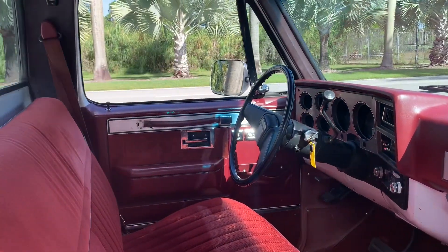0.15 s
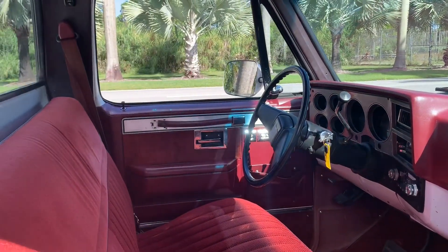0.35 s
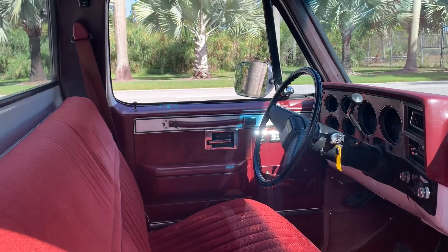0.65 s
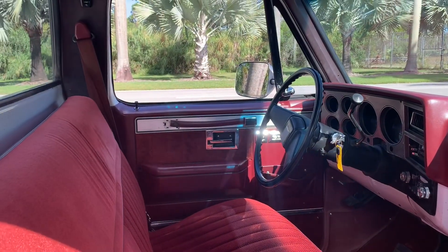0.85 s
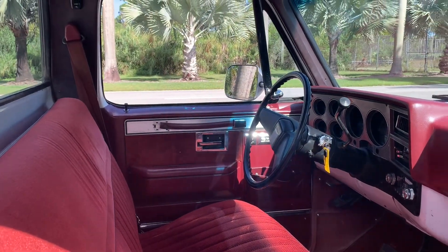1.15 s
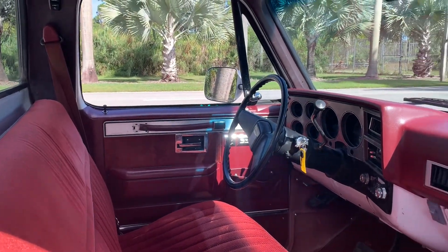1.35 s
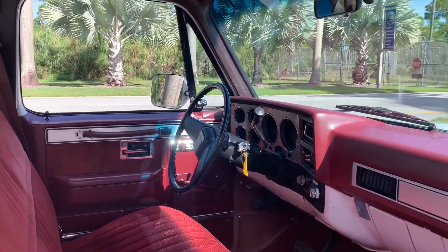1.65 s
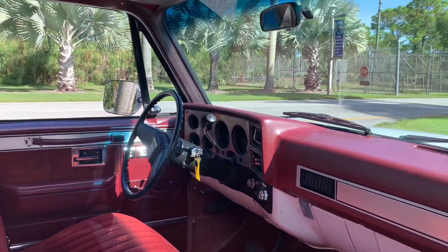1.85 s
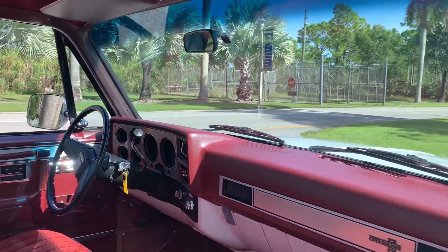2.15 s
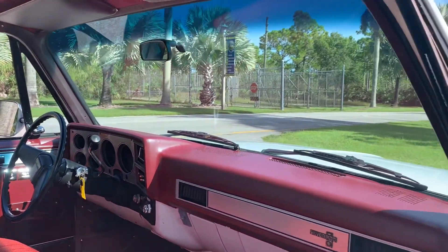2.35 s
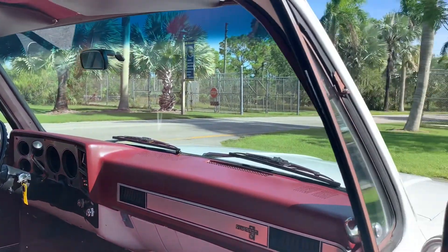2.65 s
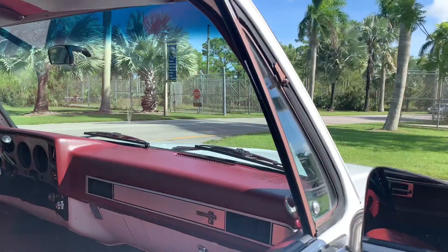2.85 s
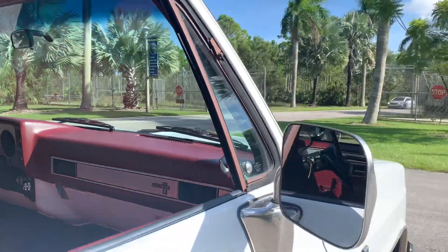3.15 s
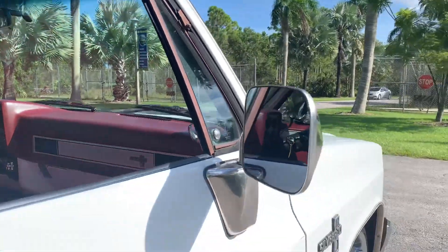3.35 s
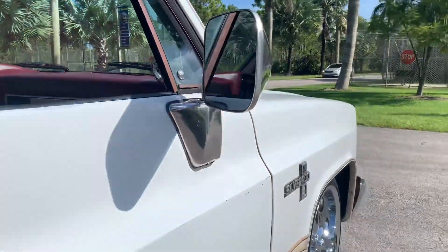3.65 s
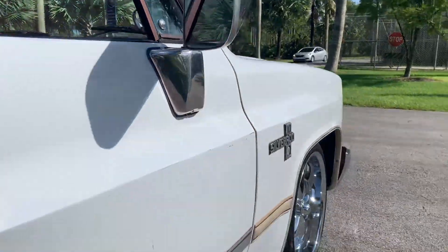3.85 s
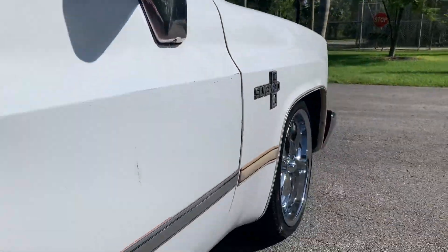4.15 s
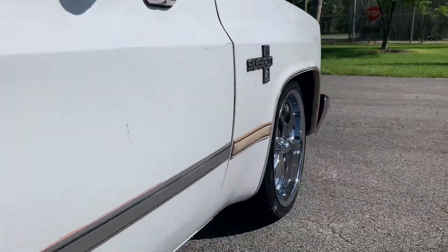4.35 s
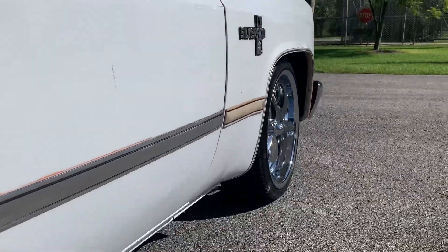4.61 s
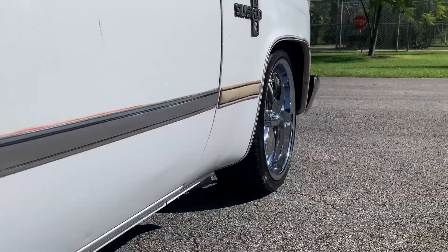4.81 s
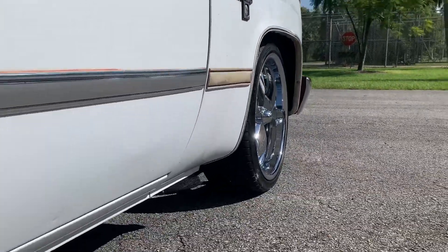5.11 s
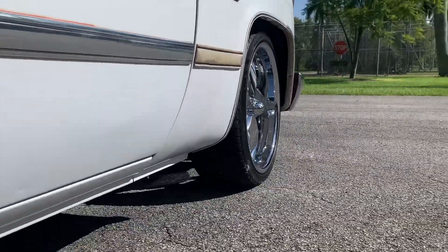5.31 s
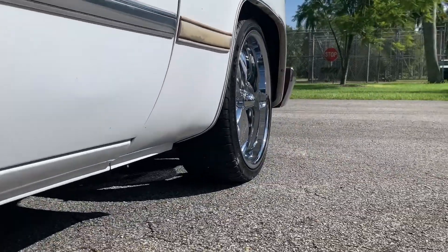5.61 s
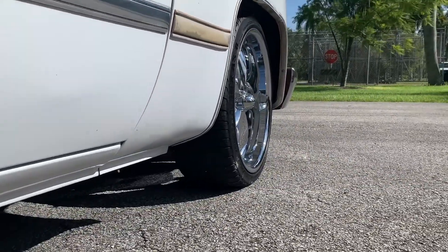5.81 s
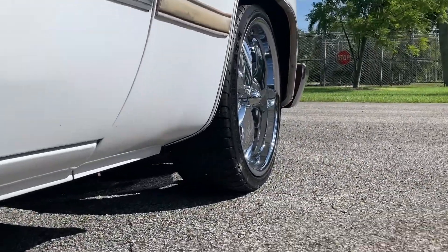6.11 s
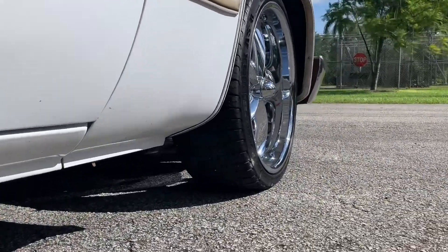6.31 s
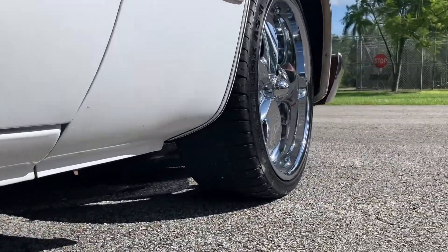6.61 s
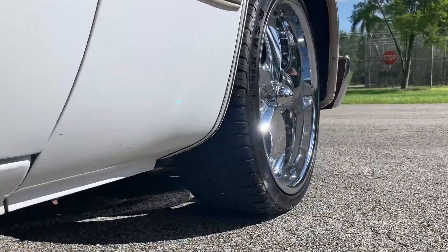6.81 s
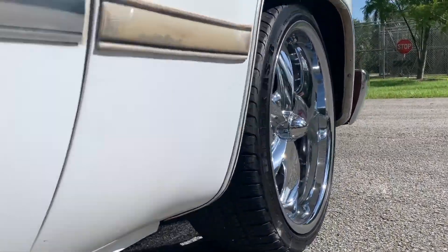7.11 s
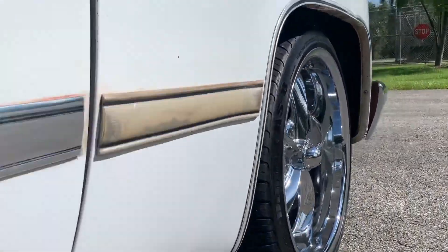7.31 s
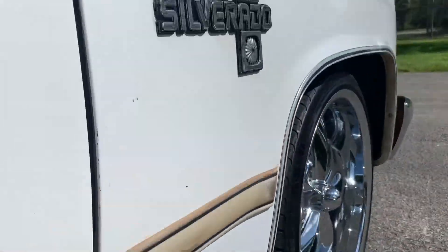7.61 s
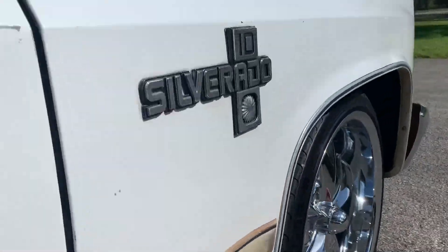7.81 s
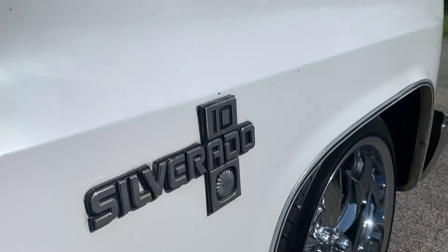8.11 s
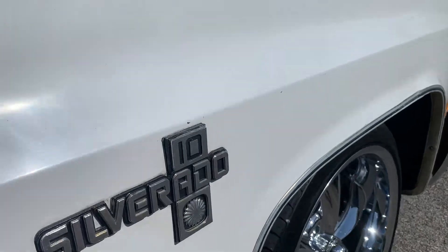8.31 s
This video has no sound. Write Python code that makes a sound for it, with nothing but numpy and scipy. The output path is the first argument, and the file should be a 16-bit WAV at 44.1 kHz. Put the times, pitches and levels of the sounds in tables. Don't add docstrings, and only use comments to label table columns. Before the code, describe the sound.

A rough eight-cylinder pickup idles outdoors, muffled and boomy inside the cab, then bright with ticking valves and clacking lifters near the front wheel.

```python
import sys
import numpy as np
from scipy import signal
from scipy.fft import rfft, irfft, next_fast_len
from scipy.io import wavfile
from scipy.ndimage import uniform_filter1d

SR = 44100
rng = np.random.default_rng(int(sys.argv[2]) if len(sys.argv) > 2 else 0)


def level_to_linear(level):
    exponent = np.asarray(level, float) / 20
    return 10 ** exponent


def digitize_waveform(pressure):
    field = np.atleast_2d(pressure).T
    bounded = np.clip(field, -1, 1)
    quanta = np.round(bounded * 32767).astype(np.int16)
    wavfile.write(sys.argv[1], SR, quanta)


N = 373086

# exhaust blow/dB, valve tick/dB, lifter tick/dB, unevenness/dB
CYLINDERS = [
    (-4.2, -6, -7, 1.2),
    (2.9, 4, 0, 1.5),
    (1.5, -14, -8, 1),
    (-.5, 0, -3, 1.2),
    (2.5, -3, 0, 4),
    (1.1, -4, -1, 1),
    (-.9, -2, -1, 4),
    (-2.4, 4.5, 2.5, 1.2),
]
# t/s, nearness to engine bay/dB, nearness to pipe/dB, cab drone/dB
WALK = [(0, -31, -13.5, -4.5), (.7, -35.5, -15, -1), (1.0, -34.5, -13.5, -1), (1.5, -34.5, -13, -4),
        (2.0, -30.5, -8, -4), (2.45, -24, -8, -18), (2.75, -20, -6.5, -17), (3.4, -16.5, -6.5, -13),
        (3.7, -13.5, -5, -19), (4.3, -11.5, -3, -11), (4.6, -10, -6.5, -6), (4.9, -7.5, -2, -12),
        (5.7, -6.5, -1, -12), (6.2, -6.5, -1, -10.5), (6.8, -5.5, 0, -33), (7.15, -5.5, -1.5, -10),
        (7.9, -11, -2, -20.5), (8.46, -11.5, -4, -39)]
# level/dB, share of the walk they feel
LIFTER, VALVE = (-47.5, 0.73), (-38.5, 1.11)


def evened(x):
    return x / np.sqrt(np.mean(x ** 2) + 1e-20)


def curves(rows):
    s, *columns = np.transpose(rows)
    return [np.interp(np.arange(N) / SR, s, c) for c in columns]


def coloured(x, gain):
    size = next_fast_len(N + 2048, True)
    return irfft(rfft(x, size) * gain(np.fft.rfftfreq(size, 1 / SR)), size)[..., :N]


def bell(hz, width):
    return lambda f: 1 / (1 + 2j * (f - hz) / width) ** 2


def slope(points):
    f, db = np.transpose(points)
    return lambda hz: level_to_linear(np.interp(np.log(hz + 1), np.log(f + 1), db))


def noise(gain, channels=2):
    size = next_fast_len(N + 2048, True)
    z = rng.standard_normal((channels, size // 2 + 1, 2)) @ [1, 1j]
    return evened(irfft(z * gain(np.fft.rfftfreq(size, 1 / SR)), size)[:, :N])


def drift(hz):
    return noise(lambda f: 1 / (1 + (f / hz) ** 4), channels=1)[0]


def swell(centre, width, db):
    return level_to_linear(db) * np.exp(-.5 * ((np.arange(N) / SR - centre) / width) ** 2)


def bumps(at, rows, width):
    return sum(db * np.exp(-((at / SR - s) / width) ** 2) for s, db in rows)


def train(at, db):
    clicks = np.zeros(N)
    clicks[np.clip(at, 0, N - 1)] = level_to_linear(db)
    return clicks


def add(mix, s, sound):
    part = mix[..., round(s * SR):][..., :sound.shape[-1]]
    part += sound[..., :part.shape[-1]]


def knock(hz, width, length):
    u = np.arange(4096) / SR / np.clip(length, .002, .02)
    spectrum = rfft(rng.standard_normal((2, 4096)))
    grit = irfft(spectrum * bell(hz, width)(np.fft.rfftfreq(4096, 1 / SR)))
    grit = grit * u * np.exp(1 - u)
    return grit / abs(grit).max(axis=1, keepdims=True)


def heard(layer):
    level_db, share = layer
    return level_db + share * curves(WALK)[0]


def ports(pair):
    # f/Hz, likeness 0-1, left lead/rad, left minus right/dB
    port_rows = [(0, .85, .1, 2.5), (150, .85, .22, 2.2), (500, .8, .7, 1.4), (1100, .55, 1.5, 1),
                 (1700, .45, 3.1, 1.5), (2700, .35, 7.8, 2.5), (3400, .15, 9.4, 0), (4100, .25, 12.57, -1),
                 (5200, .3, 15.7, -3.5), (6200, .45, 12.57, -3), (7200, .75, 11.2, -.5),
                 (8350, .98, 9.65, 0), (8850, .98, 9.25, 0), (9800, .92, 7.9, 0), (10600, .99, 6.6, 0),
                 (11300, .99, 6, 0), (12200, .92, 4.7, 0), (13100, .995, 3.4, 0), (13700, .995, 2.9, 0),
                 (14500, .92, 1.7, 0), (15400, .99, .2, 0)]
    f, same, lead, lean_db = np.transpose(port_rows)
    like = lambda hz: np.interp(hz, f, same)
    lean = lambda hz: level_to_linear(np.interp(hz, f, lean_db) / 2)
    shared = coloured(pair[0], lambda hz: like(hz) * np.exp(-1j * np.interp(hz, f, lead)))
    right = shared + coloured(pair[1], lambda hz: np.sqrt(1 - like(hz) ** 2))
    return np.array([coloured(pair[0], lean), coloured(right, lambda hz: 1 / lean(hz))])


def air():
    return level_to_linear(-82) * noise(bell(9000, 3500))


def wind():
    # t/s, peak/dB, half length/s
    gusts = [(0.034, -22, 0.061), (0.588, -29, 0.084), (1.028, -32, 0.24), (1.676, -17.5, 0.059),
             (1.883, -18, 0.033), (3.805, -32.5, 0.18), (4.214, -33, 0.15), (4.62, -28, 0.047),
             (5.65, -53, 0.11), (6.607, -31, 0.047), (8.066, -22, 0.21), (8.427, -50, 0.055)]
    breeze_db, lumps_db = -34.5, -2.5
    level = level_to_linear(breeze_db) + sum(swell(s, width, db) for s, db, width in gusts)
    buffets = noise(lambda f: bell(68, 40)(f) + 0.45 * bell(130, 40)(f))
    return level * level_to_linear(lumps_db * drift(1.7)) * buffets


def passer():
    # f/Hz, density/dB per Hz
    tyres = [(120, -11), (201, 3.5), (318, -5), (467, -10.5), (650, -20), (880, -8), (1050, -14),
             (1300, -10), (1500, -20.5), (2300, -27.5), (4000, -37), (7000, -41.5), (10500, -44),
             (15600, -68)]
    level_db, fade_db_per_s = -27.5, 13
    hidden_s, hidden_db = 0.31, -4.5
    t = np.arange(N) / SR
    gone = np.clip((.9 - t) / 0.071, 0, 1)
    hum_hz = 255 + 85 * np.exp(-t / 0.136)
    hum = level_to_linear(-19.5 - 60 * t / 0.36) * np.sin(2 * np.pi * np.cumsum(hum_hz) / SR)
    wall_db = hidden_db * np.clip((t - hidden_s) / 0.063, 0, 1)
    return level_to_linear(level_db - fade_db_per_s * t + wall_db) * gone * noise(slope(tyres)) + hum


def scuffs():
    # t/s, peak/dB, f/Hz, length/s
    steps = [(2.145, -45, 1790, 0.0056), (2.61, -36, 2320, .002), (2.621, -35, 2370, 0.0034),
             (5.666, -24, 1400, 0.0022), (5.799, -26, 926, 0.0032), (5.796, -23.5, 1710, 0.0059),
             (5.797, -22, 590, 0.0045), (5.826, -19, 910, 0.0062), (5.832, -14.5, 976, 0.0084),
             (5.843, -16.5, 980, 0.004), (5.841, -26, 513, 0.004), (5.845, -21, 1650, 0.0057),
             (5.858, -23, 970, 0.0047), (5.871, -31.5, 1700, 0.0087), (5.958, -25, 830, 0.0091),
             (6.089, -30.5, 2260, 0.0019)]
    out = np.zeros((2, N))
    for s, db, hz, length in steps:
        body = knock(hz, .45 * hz, length)
        scrape = knock(1.7 * hz, 1100, .9 * length)
        add(out, s - .003, level_to_linear(db + 2.5) * (body[0] + .3 * body + .2 * scrape))
    return out


def chirps():
    # t/s, peak/dB, f/Hz
    squeaks = [
        (.967, -52, 4150),
        (.956, -56, 5150),
        (1.133, -52, 4200),
        (1.155, -55, 4200),
        (1.184, -57, 4200),
        (.855, -58, 4150),
        (2.575, -48, 3750),
    ]
    t = np.arange(N) / SR
    return sum(level_to_linear(db) * np.exp(-((t - s) / .009) ** 2) * np.sin(2 * np.pi * hz * t) for s, db, hz in squeaks)


def roar():
    # f/Hz, density/dB per Hz
    roar_rows = [(79, -6.5), (135, -10.5), (158, -11.5), (271, -17), (318, -18), (504, -24.5), (610, -24),
                 (893, -26), (982, -24.5), (1130, -25), (1820, -30.5), (2940, -40.5), (4030, -41.5),
                 (6000, -56), (7800, -66), (13200, -120)]
    # f/Hz, loudest at t/s, half width/s, peak/dB
    whines = [
        (750, 5.3, 0.25, -42),
        (738, 6.33, 0.67, -36.5),
        (975, 1.2, 1, -54.5),
        (960, 4.37, 0.62, -42.5),
        (980, 5.4, 0.4, -41.5),
        (977, 7.1, 0.45, -37.5),
        (963, 8.3, 0.21, -39),
        (738, 7.7, 0.14, -43),
    ]
    fan, blades = (-32.5, 0.48), (-42.5, 0.58)
    frames = N // 256 + 5
    a, b, c, d, patches = rng.standard_normal((frames, 513, 5)).T
    patches = uniform_filter1d(patches, 5, axis=0)
    patches = evened(uniform_filter1d(patches, 7, axis=1))
    spectra = np.array([a + 1j * b, c + 1j * d]) * level_to_linear(2.0 * patches)
    rush = signal.istft(spectra, nperseg=1024, noverlap=768)[1][:, :N]
    rush = coloured(rush, slope(roar_rows))
    rush /= np.std(coloured(rush[0], lambda f: (f > 500) * (f < 2500)))
    out = level_to_linear(heard(fan) + 2.0) * rush
    out += level_to_linear(heard(blades)) * noise(bell(1380, 1100))
    for hz, centre, width, db in whines:
        out += swell(centre, width, db) * noise(bell(hz, 36))
    return out


def firings():
    # t/s, crank speed/rpm
    crank = [(0.0, 709.1), (0.3, 750.5), (0.9, 714.8), (1.25, 750.5), (2.05, 735.3), (2.55, 772.4),
             (3.25, 710.8), (3.75, 770.3), (4.95, 716.3), (5.5, 760.4), (5.85, 725.2), (6.3, 740.8),
             (6.5, 708.1), (7.0, 756.2), (7.5, 748.9), (7.75, 766.4), (8.25, 737.0), (8.5, 758.9)]
    first_tick = .339
    cycles = np.cumsum(curves(crank)[0]) / 120 / SR
    steps = np.floor(8 * (cycles - first_tick)).astype(int)
    at = np.flatnonzero(np.diff(steps)) + 1
    return at, steps[at] % 8


def pings(at, cylinder):
    # f/Hz, t60/s, level/dB
    modes = [(3850, .035, -3), (4120, .035, -2), (4400, .035, -3), (4980, .024, -11), (6320, .022, -11),
             (6950, .022, -10), (7400, .02, -11), (9500, .018, -8), (10400, .018, -8), (11200, .02, -5),
             (14900, .016, -10)]
    lifter, valve = level_to_linear(heard(LIFTER)), level_to_linear(heard(VALVE))
    tick_db, out = np.array(CYLINDERS)[cylinder, 1], np.zeros(N)
    chance = np.clip(rng.standard_normal((len(at), len(modes))), -3, 1.3)
    for k, (hz, t60, db) in enumerate(modes):
        r = level_to_linear(-60 / (t60 * SR))
        ring = train(at + 20, tick_db + 6.5 * chance[:, k])
        for detune in (.993, 1.007):
            turn = 2 * np.pi * hz * detune / SR
            ring = signal.lfilter([1], [1, -2 * r * np.cos(turn), r * r], ring)
        out += level_to_linear(db - 2) * (lifter if hz < 6000 else valve) * evened(ring)
    return out


def valves(at, cylinder):
    # f/Hz, width/Hz, level/dB, share of lifter clack 0-1
    covers = [
        (2770, 1270, 3.5, 0.98),
        (3990, 1800, 9.5, 1),
        (4800, 1300, 8.5, 1),
        (7240, 2350, 9, 1),
        (8300, 750, -2.5, .1),
        (8850, 1000, 3.5, .2),
        (10460, 2700, 6.5, 0),
        (12750, 3500, 4, 0.9),
        (13700, 900, -5, .06),
        (15200, 1400, -0.5, 0.5),
    ]
    # t/s, peak/dB
    hard_snaps = [(2.786, -44), (2.9886, -38), (3.1138, -34), (3.1527, -37), (3.1971, -34), (3.2585, -33),
                  (3.2799, -33.5), (3.3213, -35), (3.3617, -35), (3.4455, -30.5), (3.4874, -29.5),
                  (3.5264, -34.5), (3.6082, -30.5), (3.6496, -34), (3.683, -32), (3.7429, -30),
                  (3.762, -30), (3.8027, -30), (3.8406, -31), (3.8626, -30.5), (3.9205, -35), (3.9609, -30),
                  (3.9968, -33), (4.0377, -32), (4.075, -26.5), (4.1175, -29), (4.1559, -27), (4.1814, -30),
                  (4.2397, -24.5), (4.279, -24.5), (4.3196, -27), (4.3625, -36), (4.3814, -26.5),
                  (4.401, -26), (4.4408, -28), (4.4812, -29), (4.5001, -28.5), (4.561, -24), (4.599, -25),
                  (4.6415, -24.5), (4.726, -29), (4.768, -23.5), (4.8134, -28), (4.8324, -29),
                  (4.8753, -23.5), (4.8933, -28), (4.9172, -31), (4.938, -25), (4.9801, -27), (5.0399, -29),
                  (5.0584, -27), (5.1013, -24.5), (5.1442, -25.5), (5.225, -21.5), (5.2654, -23),
                  (5.3088, -27),
                  (5.3088, -27.5), (5.3258, -25), (5.3667, -21), (5.424, -23), (5.4625, -29),
                   (5.5034, -27), (5.5418, -21), (5.6221, -28), (5.7029, -21), (5.7443, -29),
                   (5.7862, -23.5), (5.9528, -29), (5.9723, -22.5), (6.032, -19), (6.0731, -24),
                   (6.1135, -25), (6.1738, -20.5), (6.191, -19), (6.2347, -18.5), (6.2796, -30),
                   (6.2956, -18), (6.3445, -34), (6.357, -20), (6.401, -22), (6.4407, -26), (6.461, -21),
                   (6.5034, -17.5), (6.5225, -21), (6.5643, -16), (6.6069, -25), (6.6727, -24),
                   (6.6922, -19.5), (6.7341, -19.5), (6.7725, -25), (6.7954, -20), (6.835, -24),
                   (6.855, -18.5), (6.894, -22), (6.9361, -26.5), (7.0134, -24), (7.0526, -21.5),
                   (7.0923, -32), (7.1332, -31), (7.1731, -26), (7.213, -24), (7.2504, -25), (7.334, -27),
                   (7.3741, -27), (7.411, -30), (7.4764, -27), (7.494, -26), (7.5722, -31), (7.6335, -32),
                   (7.7273, -25.5), (7.807, -27.5), (7.8475, -28), (7.8865, -26.5), (7.9658, -33),
                   (8.0456, -34), (8.2097, -30)]
    # t/s, peak/dB, f/Hz
    clacks = [(2.8895, -36, 3940), (3.2606, -36, 4110), (3.3885, -30, 4030), (3.5699, -40, 4130),
              (3.5869, -33.5, 4400), (4.0798, -38, 3920), (4.185, -30.5, 3940), (4.3492, -32, 3940),
              (4.443, -42, 4100), (4.5018, -35, 4050), (4.5627, -34, 4140), (4.6679, -30, 4160),
              (4.7263, -31, 4160), (4.7682, -44, 4000), (4.8326, -33, 4100), (4.8725, -39, 3860),
              (5.0401, -31, 4620), (5.1, -36, 3990), (5.165, -28, 4140), (5.2227, -40, 4110),
              (5.3275, -33, 4470), (5.3674, -33, 4030), (5.4262, -51, 4160), (5.524, -34, 4000),
              (5.6278, -49, 4450), (5.6437, -32, 3750), (5.704, -44, 3920), (5.9535, -44, 4700),
              (5.975, -30, 4400), (6.0748, -46, 4240), (6.1132, -37, 3710), (6.1753, -29, 3960),
              (6.2394, -47, 3940), (6.3027, -32, 4160), (6.3586, -45, 4000), (6.4644, -29, 4250),
              (6.5038, -38, 4150), (6.5226, -30, 3880), (6.562, -36, 3950), (6.6719, -37, 4260),
              (6.6914, -33, 3750), (6.7333, -39, 3890), (6.7961, -21, 3900), (6.837, -29, 4130),
              (6.8979, -49, 3800), (7.062, -36, 4200), (7.0959, -31.5, 4370), (7.1305, -37, 4020),
              (7.2546, -34, 4040), (7.2765, -29.5, 4030), (7.376, -33, 3980), (7.445, -30, 3740),
              (7.5324, -36, 3830), (7.754, -30, 4090), (7.7909, -36, 3740), (7.9091, -30.5, 3660),
              (8.2303, -32, 3950), (8.392, -33, 3990)]
    # t/s, peak/dB, f/Hz
    rockers = [(3.3845, -32, 6500), (3.4873, -32, 6500), (3.6434, -29, 7400), (3.7462, -29, 6400),
               (3.8026, -30, 5530), (3.9188, -34, 6430), (3.957, -30, 5400), (4.2386, -28.5, 6270),
               (4.279, -28, 7140), (4.3398, -31, 5470), (4.3817, -34, 6700), (4.4002, -31, 6300),
               (4.5588, -26.5, 6680), (4.6007, -32, 6800), (4.7254, -31, 6400), (4.8292, -26, 6250),
               (4.892, -30, 6100), (4.934, -31, 5570), (5.1011, -27, 6400), (5.2213, -33, 6800),
               (5.2652, -32, 6730), (5.3855, -28.5, 6340), (5.5401, -27, 6760), (5.7032, -40, 6400),
               (5.7416, -28, 7550), (6.03, -30, 6300), (6.0734, -25, 6380), (6.1944, -29, 7460),
               (6.2355, -30, 7170), (6.2989, -32, 7240), (6.3592, -26, 6830), (6.4006, -38, 7360),
               (6.4421, -21, 6620), (6.462, -23, 7100), (6.5234, -28, 6770), (6.5626, -24, 7040),
               (6.6491, -31, 7300), (6.6915, -28, 6500), (6.7329, -31, 7030), (6.7943, -26, 7360),
               (6.8372, -28, 7260), (6.895, -24, 7050), (7.018, -36, 6900), (7.1724, -30, 6660),
               (7.2123, -29, 6700), (7.3734, -32, 6460), (7.4338, -29, 7500), (7.4927, -36, 6100),
               (7.5356, -34, 6500), (7.9656, -30, 6800)]
    snap_over_hiss_db, soft_snap_db = 20.5, -5
    cab_muffle, cab_edge_db = .4, -29

    lifter_db, valve_db = heard(LIFTER), heard(VALVE)
    _, tick_db, clack_db, uneven_db = np.array(CYLINDERS)[cylinder].T
    tick_db = tick_db + soft_snap_db
    s, peak_db = np.transpose(hard_snaps)
    hard = abs(at[:, None] / SR - s).argmin(axis=0)
    at = at.copy()
    at[hard] = (s * SR).astype(int) + 40
    tick_db[hard] = peak_db - valve_db[at[hard]] - snap_over_hiss_db
    clack_db[hard] = .5 * clack_db[hard] + 0.6 * tick_db[hard]
    uneven_db[hard] = 0
    muffle_db = cab_muffle * np.minimum(curves(WALK)[0] - cab_edge_db, 0)

    t, out = np.arange(2000) / SR, np.zeros((2, N))
    decay = level_to_linear(-120 * t / .05) + .08 * level_to_linear(-120 * t / .17)
    burst = (1 - np.exp(-t / .0015)) ** 2 * decay
    chance = np.clip(rng.standard_normal((len(at), len(covers) + 1)), -2, 1.4)
    for k, (hz, width, db, share) in enumerate(covers):
        strength_db = share * clack_db + (1 - share) * tick_db
        strength_db = strength_db + (2 + 1.5 * share) * chance[:, k] + .6 * uneven_db * chance[:, -1]
        power = signal.oaconvolve(train(at - 60, 2 * strength_db), burst)[:N]
        level_db = db + share * lifter_db + (1 - share) * valve_db + (k >= 7) * muffle_db
        hiss = 0.017 + 0.21 * share
        out += level_to_linear(level_db) * noise(bell(hz, 1.7 * width)) * evened(np.sqrt(abs(power) + hiss))
    out *= level_to_linear(1.0)
    for rows, lift_db, width, length in ((clacks, 0.5, 200, .0065), (rockers, -2.5, 300, .0045)):
        for s, db, hz in rows:
            add(out, s - .002, level_to_linear(db + lift_db) * knock(hz, width, length))
    return out


def exhaust(at, cylinder):
    # t/s, level/dB
    stumbles = [(2.12, -12), (2.759, -15), (3.019, -19), (3.44, -0.5), (4.24, -10), (4.73, -0.5),
                (5.07, 1.5), (5.22, -19.5), (5.719, -2), (5.879, -13), (6.048, 0.5), (6.358, 6),
                (6.569, -5), (6.701, -7.5), (7.19, -2.5), (8.31, -5)]
    # t/s, level/dB
    surges = [(.19, 1.5), (.35, -0.5), (.61, -13), (.74, -1), (.85, 0), (.96, 5), (1.42, 1), (1.5, -4),
              (1.83, -11), (1.93, -2.5), (2.15, 3), (2.65, 0), (2.9, 2), (3.1, -1.5), (4.06, -6), (4.5, 4),
              (5.51, -3), (5.74, -0.5), (6.36, -6), (6.459, 3.5), (6.68, -7), (6.73, 2.5), (7.29, 2.5),
              (7.4, -2), (7.88, -4), (7.95, 2.5), (8.01, -4), (8.12, -10.5), (8.37, 3)]
    # f/Hz, width/Hz, level/dB
    upper_rows = [
        (152, 69, -3.5),
        (205.3, 29.4, 4.5),
        (267.6, 42, -6.5),
        (308.8, 23, -2.5),
        (403.7, 32, -14),
    ]
    # t/s, level/dB
    blooms = [(1.2, 3.5), (2.2, -3), (3.0, -5.5), (3.5, -2), (4.0, 1), (4.5, 3.5), (5.0, 3), (5.35, -7),
              (5.65, 4), (6.1, 2.5), (6.45, -1), (7.1, -3.5), (8.05, -1)]
    # t/s, bass left minus right/dB, lag of right port/samples
    pan = [
        (0, 2.8, 5),
        (.5, 2.6, 14),
        (1.4, 2.5, 7),
        (2.05, 1.1, -2),
        (3.2, 1.7, 8),
        (4.4, 1.5, 17),
        (5.7, 2.9, 18),
        (6.9, 3.3, 16),
        (7.5, 2.3, 8),
        (8.46, 1.7, 6),
    ]
    lope = 0.99
    boom_db, thrum_db, upper_pipe = -11, -17.5, (-30, 0.17)
    shade_s, shade_db = 7, -7
    thrum_lag = 2.6

    chance = rng.standard_normal((len(at), 3))
    blow_db = lope * np.array(CYLINDERS)[cylinder, 0]
    blow_db = blow_db + bumps(at, stumbles, 0.022) + bumps(at, surges, 0.048)
    late = (13 * chance[:, 1]).astype(int)
    thrum = train(at, .4 * blow_db + .6 * chance[:, 0])
    thrum = coloured(thrum, lambda f: bell(49, 14)(f) * (f / 49) ** 2 * (f < 75))
    boom = train(at + late, blow_db + 1.2 * chance[:, 0])
    boom = coloured(boom, lambda f: bell(103, 28)(f) * (f / 101) ** 2 * (f < 135))
    drive = 0.5 * evened(train(at + 2 * late, blow_db + 1.0 * chance[:, 2])) + rng.standard_normal(N)
    modes = lambda f: sum(level_to_linear(db) * bell(hz, width)(f) / np.sqrt(width) for hz, width, db in upper_rows)
    upper = coloured(drive, modes)

    n, (_, pipe_db, cab_db) = np.arange(N), curves(WALK)
    low = level_to_linear(thrum_db + cab_db) * evened(thrum)
    upper_db = heard(upper_pipe) + np.interp(n, at, bumps(at, blooms, 0.089))
    upper_db = upper_db + shade_db * np.clip((n / SR - shade_s) / 0.1, 0, 1)
    mono = level_to_linear(boom_db + pipe_db) * evened(boom) + level_to_linear(upper_db) * evened(upper)
    lean_db, lag = curves(pan)
    left = (low + mono) * level_to_linear(lean_db / 2)
    right = np.interp(n - thrum_lag * lag, n, low) + np.interp(n - lag, n, mono)
    return np.array([left, right / level_to_linear(lean_db / 2)])


def scene():
    at, cylinder = firings()
    around = air() + wind() + passer()
    engine_bay = roar() + pings(at, cylinder) + valves(at, cylinder)
    return ports(around + engine_bay) + scuffs() + chirps() + exhaust(at, cylinder)


def band_limit(x):
    return signal.sosfilt(signal.butter(12, 17020, fs=SR, output="sos"), x)


def record(dry):
    rolled = signal.sosfilt(signal.butter(4, 35, "high", fs=SR, output="sos"), dry)
    limited = coloured(1.2 * np.tanh(rolled / 1.2), lambda f: f < 15880)
    return band_limit(limited)


dry = scene()
out = record(dry)
digitize_waveform(out)
```